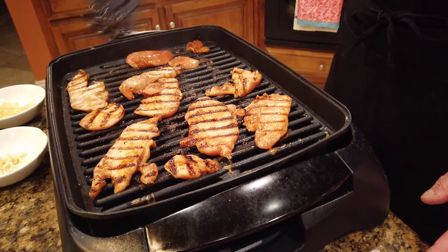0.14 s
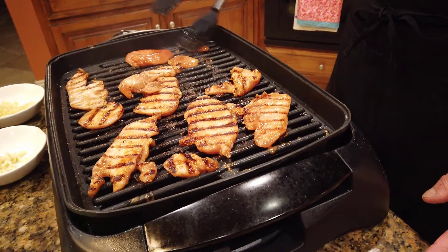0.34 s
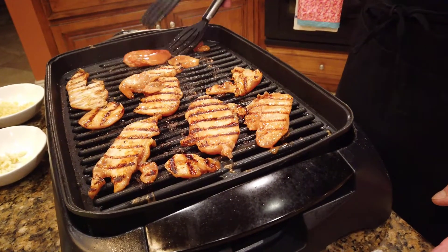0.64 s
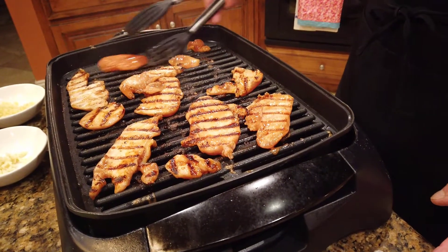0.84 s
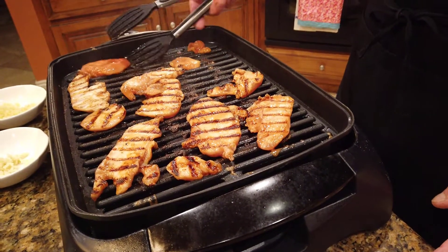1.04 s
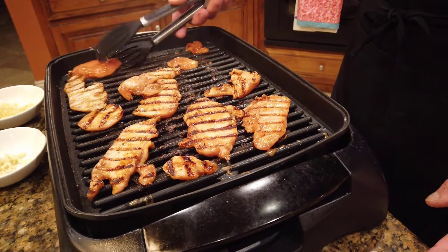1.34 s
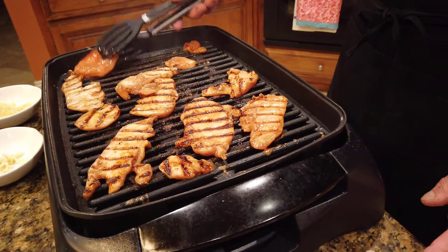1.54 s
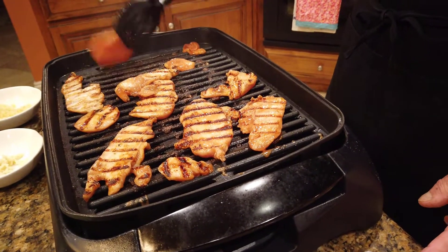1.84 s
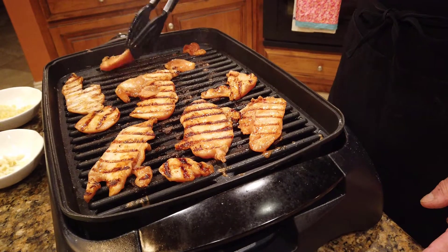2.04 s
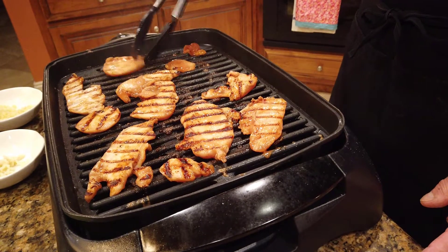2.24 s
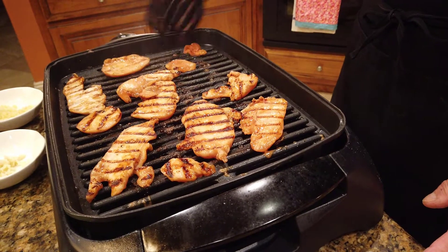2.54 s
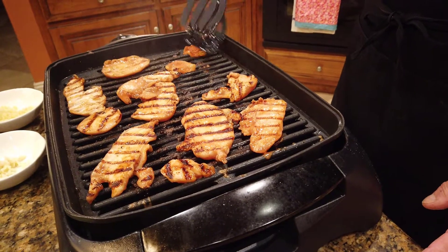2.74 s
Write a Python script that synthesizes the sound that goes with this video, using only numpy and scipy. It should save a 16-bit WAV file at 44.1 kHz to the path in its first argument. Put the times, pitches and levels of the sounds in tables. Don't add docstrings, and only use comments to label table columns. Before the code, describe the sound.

Chicken sizzles on a hot grill plate throughout, a dense, bright, crackling hiss. A thin high steam hiss swells near 0.45 s; a soft low pop comes around 0.85. From 1.0 to 1.8 fuzzy, whistling steam sputters in puffs and the sizzle surges near 1.6. Sharp fat spits snap around 1.3, 1.5, 2.15 and 2.3, low pops follow after 2.0, and steam returns near 2.4. Faint tong bumps and fan roar sit beneath.

```python
import sys
import numpy as np
from scipy import signal
from scipy.fft import rfft, irfft
from scipy.io import wavfile
from scipy.ndimage import uniform_filter1d

SR = 44100
rng = np.random.default_rng(int(sys.argv[2]) if len(sys.argv) > 2 else 0)


def magnitude_from_level(level_db):
    exponent = np.asarray(level_db, float) / 20
    return 10 ** exponent


def store_pcm(level_fs):
    pcm = np.round(np.clip(level_fs, -1, 1) * 32767).astype(np.int16)
    wavfile.write(sys.argv[1], SR, np.atleast_2d(pcm).T)


N = 127890

# pitch_hz, level_db (per Hz)
FIZZ_COLOUR = [(1800, -10.5), (3000, -8), (5100, -7.5), (5800, -3.5), (9200, -4), (10500, -7), (12500, -10),
               (15800, -15)]
# start_s, level_db
JUICE_FLOW = [
    (0.0, -39),
    (0.66, -39.5),
    (1.57, -36.5),
    (1.78, -38.5),
    (1.79, -38),
    (1.88, -39.5),
    (2.02, -37.5),
    (2.22, -38.5),
    (2.67, -37.5),
    (2.9, -39),
]
CRACKLE_DB, CRACKLES_PER_S, CRACKLE_SPREAD_DB = -6, 2500, 3.0
PATCHY_DB, FLICKER_DB = 0.78, 0.41
DARK_HZ, DARK_SHARE, DARK_FROM_DB = 5250, 1.56, -38.5

# start_s, level_db, pitch_hz
VENT_PATH = [(1.0, -60, 3400), (1.02, -41, 3470), (1.12, -49, 3250), (1.15, -41, 3040), (1.28, -39.5, 3300),
             (1.42, -41, 3140), (1.49, -43, 3100), (1.58, -40, 3080), (1.67, -41.5, 2680),
             (1.78, -51, 2570), (1.97, -54, 2920), (2.05, -47, 3000), (2.365, -53, 3220),
             (2.385, -46, 3230), (2.62, -46, 3220), (2.8, -43, 2810), (2.9, -46, 3170)]
VENT_WIDTH_HZ, VENT_SPLIT = 810, 0.062
SPUTTER_DB, SPUTTER_S = 2.2, 0.0023
# pitch_hz, width_hz, level_db
WHISTLES = [(2780, 68, -10), (2970, 60, -18), (3177, 50, -10.5), (3290, 32, -11), (3355, 29, -9),
            (3514, 37, -10), (3590, 47, -5.5)]
WHISTLE_REACH_HZ = 447
# start_s, level_db, pitch_hz
SEAM_PATH = [(0, -50, 5850), (.1, -50, 6000), (.3, -45, 5900), (.42, -43, 5970), (.45, -40.5, 5990),
             (.52, -44, 6200), (.62, -45, 6350), (.72, -49, 5900), (.84, -48, 5800), (.88, -44.5, 5830),
             (1.0, -47, 5900), (1.1, -56, 6000)]
SEAM_WIDTH_HZ, SEAM_SPLIT = 400, 0.046
# start_s, peak_db, pitch_hz
SPURTS = [(0.1755, -38, 4380), (0.821, -37, 2700), (1.0111, -31, 3090), (1.1182, -32, 3110),
          (1.144, -23, 3100), (1.199, -25, 3160), (1.2156, -26, 3320), (1.2625, -23, 3290),
          (1.346, -28, 3180), (1.4232, -28, 3210), (1.492, -33, 3300), (1.507, -25.5, 3160),
          (1.521, -26, 3000), (1.5549, -28, 3470), (1.6432, -27, 2930), (1.6771, -22.5, 2690),
          (1.701, -28, 2860), (2.0056, -28, 3560), (2.3795, -32, 3210), (2.4339, -33, 3240),
          (2.5671, -30, 3390), (2.5955, -29, 3450), (2.6494, -29.5, 4120), (2.7437, -31, 2820),
          (0.3164, -26, 5800),
    (0.4854, -33, 6190),
    (0.7514, -29, 5720),
    (0.8514, -31, 5710),
    (1.4954, -22, 7850),
    (1.6734, -25, 7370),
    (1.7774, -25, 9100),
    (2.5694, -23.5, 9060),
]
SPURT_DB, SPURT_S, SPURT_Q = -11, 0.011, 4.7
# middle_s, length_s, level_db,
# pitch_hz, width_hz
SWELLS = [(0.092, 0.24, -43, 8600, 700), (1.2, .3, -47, 9400, 900), (1.37, .1, -38.5, 6450, 400),
          (1.37, 0.098, -39, 8300, 750), (1.5, 0.13, -41.5, 7500, 830), (1.53, 0.15, -45, 6500, 600),
          (1.65, 0.091, -40, 7300, 800), (1.58, 0.12, -46, 4300, 500), (1.56, 0.12, -48, 10000, 700),
          (1.82, 0.081, -42, 9000, 900), (1.97, 0.32, -49, 5500, 560), (2, 0.16, -45, 5770, 770),
          (2.06, 0.31, -48, 11600, 2800), (1.8, 0.22, -50, 15000, 660), (2.68, .06, -47, 6200, 500),
          (1.25, 0.11, -44, 8600, 500), (1.5, .45, -43, 6900, 1900), (1.9, .14, -48, 2350, 500),
          (2, .03, -43, 9800, 1500), (2.3, 0.14, -47, 8900, 900), (2.68, .08, -48, 7000, 550),
          (2.5, .06, -41, 6200, 900), (1.35, .35, -52.5, 2350, 420), (1.75, .15, -51, 1530, 440),
          (.335, 0.13, -46, 965, 41), (.49, .08, -55, 1100, 60), (1, .05, -56, 550, 89),
         (2.5, .1, -48, 960, 36), (.87, 0.088, -51, 419, 29), (2.32, .2, -50, 760, 270),
         (2.8, 0.24, -51.5, 780, 300), (0.049, 0.13, -52.5, 780, 250), (.17, 0.067, -57, 280, 33),
         (2.02, .06, -54, 365, 51), (1.6, .08, -53, 370, 32), (1.79, .07, -53, 2600, 200),
         (2.68, .2, -53, 1510, 310), (1.38, .2, -48.5, 680, 290)]

# start_s, peak_db, pitch_hz
POPS = [(0.298, -38, 953), (0.333, -43, 950), (0.459, -42, 982), (0.847, -30.5, 625), (1.676, -40, 960),
        (2.008, -26, 940), (2.179, -28, 790), (2.427, -33, 820), (2.522, -26, 970), (2.746, -31, 1010),
        (2.867, -27, 1100)]
# start_s, peak_db, pitch_hz
SPITS = [
    (1.2624, -28, 3310),
    (1.2724, -18, 2900),
    (1.4564, -15, 7810),
    (1.5144, -20, 6840),
    (2.0044, -28, 5600),
    (2.0674, -28, 7090),
    (2.0794, -31, 6650),
    (2.1554, -13.5, 6120),
    (2.2844, -16, 9230),
]
POP_CYCLES, SPIT_CYCLES = 1.3, 1.4
# start_s, peak_db, pitch_hz
THUMPS = [
    (.085, -62, 70),
    (0.236, -59, 162),
    (.832, -54, 85),
]

# pitch_hz, width_hz, level_db
PLATE = [(196.7, 7.3, -19.5), (279, 38, -11.5), (440, 61, -6.5), (638, 87, -0.5), (781, 82, -3.5),
         (865, 48, -2.5), (987, 55, -3.5), (1129, 52, -5.5), (1495, 46, -3), (1618, 69, -5)]
BUBBLE_DB, BUBBLES_PER_S, BUBBLE_SPREAD_DB = -47.5, 900, 2.5
PING_DB, PINGS_PER_S, PING_CYCLES, PING_LO_HZ, PING_HI_HZ = -54, 12, 34, 599.3, 4226

# pitch_hz, level_db (per Hz)
FAN_COLOUR = [(15, -53), (25, -22.5), (212, -11.5), (443, -1.5), (546, -6.5), (635, -3), (963, 0),
              (1260, -6.5), (2300, -17), (2990, -32), (5060, -120)]
FAN_DB = -48
# pitch_hz, level_db
HUM = [
    (59.9, -80),
    (119.7, -70.5),
]

# middle_s, low_hz, high_hz
UNLIKE = [(.16, 11000, 12500), (.95, 5700, 7000), (1.23, 10300, 11900), (1.9, 10300, 11900),
          (2.25, 5200, 6400), (2.25, 9600, 11100), (2.39, 11000, 13800), (2.62, 5200, 7000),
          (2.62, 8300, 11900), (2.67, 13100, 15200), (2.785, 9000, 10400), (2.89, 9000, 10400),
          (2.89, 11700, 13200)]
UNLIKE_S, UNLIKE_DB = .03, -2.5
EDGE_HZ = 15690


def evened(x):
    return x / np.sqrt(np.mean(x ** 2) + 1e-20)


def coloured(x, points):
    f, db = np.transpose(points)
    hz = np.abs(np.fft.fftfreq(8192, 1 / SR)) + 1
    points_hz = np.r_[f[0] / 2, f, 1.6 * f[-1]]
    points_db = np.r_[db[0] - 20, db, db[-1] - 20]
    log_gain = np.log(magnitude_from_level(np.interp(np.log(hz), np.log(points_hz), points_db)))
    taps = np.fft.ifft(np.exp(np.conj(signal.hilbert(log_gain)))).real[:4096]
    return evened(signal.oaconvolve(x, taps)[:N])


def resonate(x, hz, width_hz):
    turn = np.exp(2j * np.pi * np.cumsum(hz * np.ones(len(x))) / SR)
    r = np.exp(-np.pi * width_hz / SR)
    return 2 * (turn * signal.lfilter([1 - r], [1, -r], x / turn)).real


def clicks(per_s, spread_db):
    size = magnitude_from_level(spread_db * np.minimum(rng.exponential(size=N), 5))
    size = size * rng.choice([-1., 1.], size=N)
    return evened(size * (rng.random(N) < per_s / SR))


def wobble(count, seconds):
    r = np.exp(-1 / (seconds * SR))
    return evened(signal.lfilter([1], np.convolve([1, -r], [1, -r]), rng.standard_normal(count)))


def add(mix, s, sound):
    part = mix[max(round(s * SR), 0):][:len(sound)]
    part += sound[:len(part)]


def fizz():
    drive = rng.standard_normal(N) + magnitude_from_level(CRACKLE_DB) * clicks(CRACKLES_PER_S, CRACKLE_SPREAD_DB)
    z = signal.stft(coloured(drive, FIZZ_COLOUR), nperseg=256, noverlap=192)[2]
    patches = uniform_filter1d(rng.standard_normal(z.shape), size=4, axis=0)
    patches = uniform_filter1d(patches, size=30, axis=1)
    s, db = np.transpose(JUICE_FLOW)
    dry_db = np.minimum(np.interp(np.arange(z.shape[1]) * 64 / SR, s, db) - DARK_FROM_DB, 0)
    dark = np.outer(np.fft.rfftfreq(256, 1 / SR) < DARK_HZ, DARK_SHARE * dry_db)
    shaped = z * magnitude_from_level(dark + PATCHY_DB * evened(patches))
    x = signal.istft(shaped, nperseg=256, noverlap=192)[1][:N]
    level_db = 2.5 + np.interp(np.arange(N) / SR, s, db) + FLICKER_DB * wobble(N, 0.0066)
    return evened(x) * magnitude_from_level(level_db)


def steam(count, hz, width_hz):
    air = rng.standard_normal(count) * magnitude_from_level(SPUTTER_DB * wobble(count, SPUTTER_S))
    return evened(resonate(resonate(air, hz, width_hz), hz, width_hz))


def vent():
    s, db, hz = np.transpose(VENT_PATH)
    t = np.arange(N) / SR
    cavity = np.interp(t, s, hz)
    air = evened(sum(steam(N, cavity * (1 + side * VENT_SPLIT), VENT_WIDTH_HZ) for side in (-1, 1)))
    strength = magnitude_from_level(0.69 * np.minimum(np.interp(t, s, db) + 40, 0))
    for tone_hz, width_hz, whistle_db in WHISTLES:
        near = np.exp(-((cavity - tone_hz) / WHISTLE_REACH_HZ) ** 2) * strength
        air = air + near * magnitude_from_level(whistle_db + 2.1 * wobble(N, .025)) * steam(N, tone_hz, width_hz)
    return magnitude_from_level(np.interp(t, s, db, left=-100)) * evened(air)


def seam():
    s, db, hz = np.transpose(SEAM_PATH)
    t = np.arange(N) / SR
    cavity = np.interp(t, s, hz)
    air = 0.47 * steam(N, 1.08 * cavity, 1100)
    for side in (-1, 1):
        air = air + magnitude_from_level(2.2 * wobble(N, .02)) * steam(N, cavity * (1 + side * SEAM_SPLIT), SEAM_WIDTH_HZ)
    return magnitude_from_level(np.interp(t, s, db, right=-100)) * evened(air)


def spurts():
    out, t = np.zeros(N), np.arange(2000) / SR
    for s, db, hz in SPURTS:
        puff = np.minimum(t / 0.0014, 1) * np.exp(-t / SPURT_S)
        air = steam(4000, hz, hz / SPURT_Q)[2000:]
        add(out, s, magnitude_from_level(db + SPURT_DB) * puff * air)
    return out


def pockets():
    out = np.zeros(N)
    for mid, length, db, hz, width_hz in SWELLS:
        u = (np.arange(N) / SR - mid) / length
        near = np.flatnonzero(abs(u) < 1)
        air = steam(SR, hz, width_hz)[:len(near)]
        swell = np.exp(-8 * u[near] ** 2)
        out[near] += magnitude_from_level(db) * evened(swell * air) * np.sqrt(np.mean(swell ** 2))
    return out


def pops():
    out, t = np.zeros(N), np.arange(3000) / SR
    for rows, cycles in ((POPS, POP_CYCLES), (SPITS, SPIT_CYCLES)):
        for s, db, hz in rows:
            shape = np.exp(-t * hz / cycles) * (1 - np.exp(-2.5 * t * hz))
            add(out, s, -magnitude_from_level(db + 1) * shape * np.sin(2 * np.pi * hz * t))
    return out


def bubbling():
    drive = clicks(BUBBLES_PER_S, BUBBLE_SPREAD_DB) + 0.6 * rng.standard_normal(N)
    ringing = np.zeros(N)
    for k, (hz, width_hz, db) in enumerate(PLATE):
        ringing += (-1) ** k * magnitude_from_level(db) * evened(resonate(drive, hz, width_hz))
    return magnitude_from_level(BUBBLE_DB + 1.2 * wobble(N, 0.026)) * evened(ringing)


def pings():
    out = np.zeros(N)
    for hz in np.geomspace(PING_LO_HZ, PING_HI_HZ, num=24):
        out += evened(resonate(clicks(PINGS_PER_S, 2.5), hz, hz / PING_CYCLES))
    return magnitude_from_level(PING_DB) * evened(out)


def thumps():
    out, t = np.zeros(N), np.arange(3000) / SR
    for s, db, hz in THUMPS:
        add(out, s, magnitude_from_level(db) * np.sin(2 * np.pi * hz * t) * t * 100 * np.exp(1 - t * 100))
    return out


def fan():
    t = np.arange(N) / SR
    out = magnitude_from_level(FAN_DB) * coloured(rng.standard_normal(N), FAN_COLOUR)
    for hz, db in HUM:
        tone = np.sin(2 * np.pi * (hz * t + rng.random()))
        out = out + np.sqrt(2) * magnitude_from_level(db + 3.1 * wobble(N, 0.026)) * tone
    return out


def scene():
    steam_sounds = vent() + seam() + spurts() + pockets()
    mono = fizz() + steam_sounds + pops() + bubbling() + pings() + thumps() + fan()
    return np.array([mono, mono])


def band_limit(x):
    return signal.sosfilt(signal.butter(12, 16950, fs=SR, output="sos"), x)


def record(dry):
    hz, t, z = signal.stft(dry[0], SR, nperseg=256, noverlap=192)
    mask = np.zeros(z.shape)
    for s, lo_hz, hi_hz in UNLIKE:
        middle_s = (np.round((s * SR - 890) / 1024) * 1024 + 890) / SR
        swell = np.clip(1 - ((t - middle_s) / UNLIKE_S * 1.3) ** 2, 0, 1) ** 2
        mask += np.outer((hz > lo_hz) & (hz < hi_hz), swell)
    other = signal.stft(np.roll(dry[0], 3001), SR, nperseg=256, noverlap=192)[2]
    side = magnitude_from_level(UNLIKE_DB) * signal.istft(other * mask, SR, nperseg=256, noverlap=192)[1][:N]
    side = side + magnitude_from_level(-89) * coloured(rng.standard_normal(N), [(20, 0), (90, -7), (220, -14)])
    spectrum = rfft(dry + np.array([side, -side]))
    both = irfft(spectrum * (np.fft.rfftfreq(N, 1 / SR) < EDGE_HZ), N)
    return band_limit(both)


dry = scene()
out = record(dry)
store_pcm(out)
```